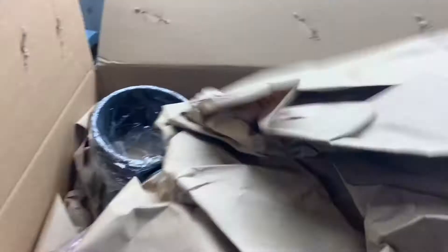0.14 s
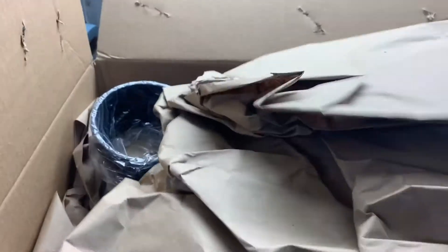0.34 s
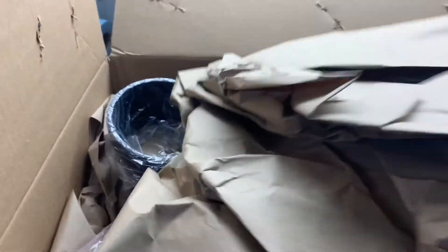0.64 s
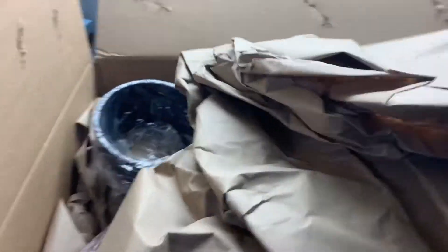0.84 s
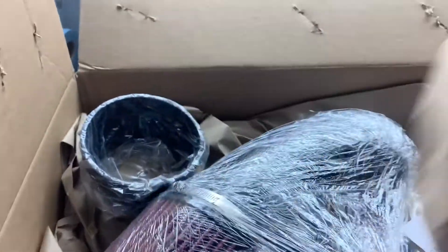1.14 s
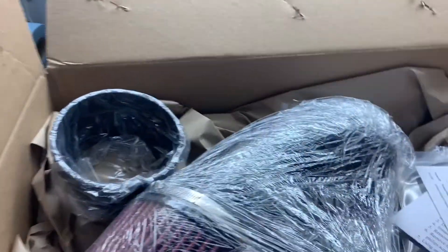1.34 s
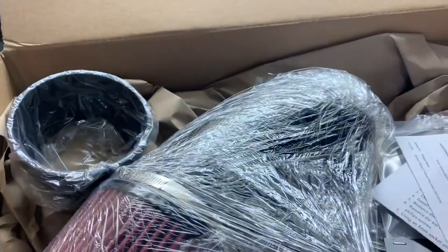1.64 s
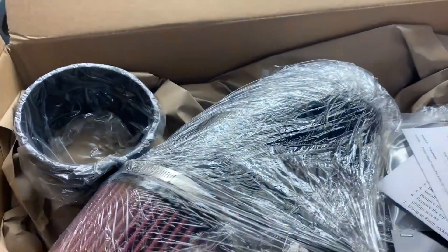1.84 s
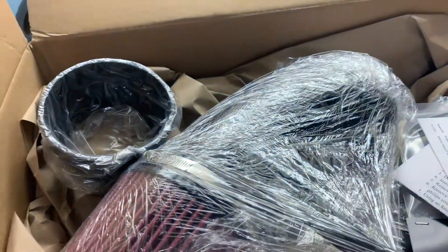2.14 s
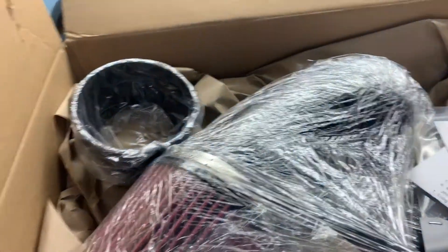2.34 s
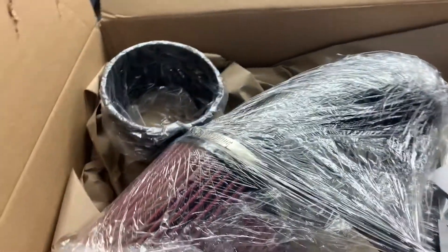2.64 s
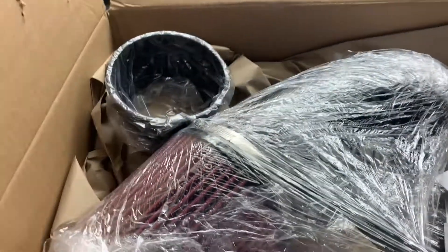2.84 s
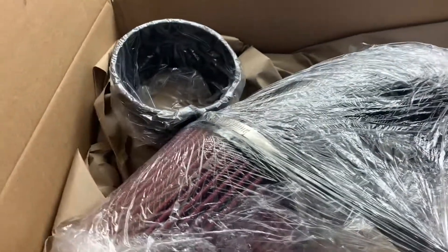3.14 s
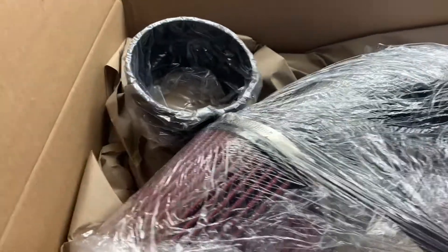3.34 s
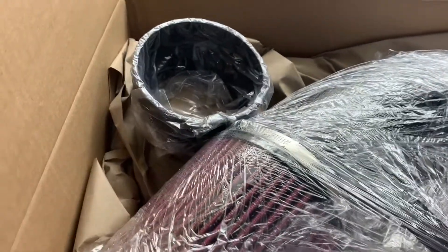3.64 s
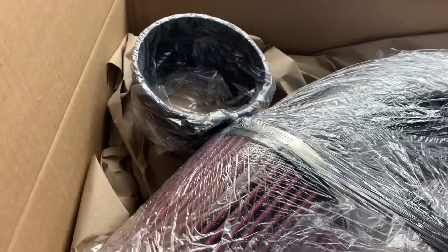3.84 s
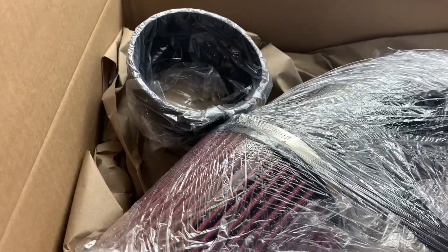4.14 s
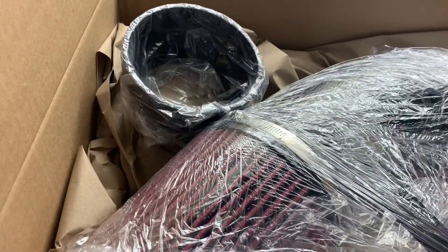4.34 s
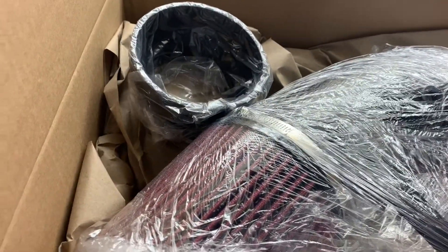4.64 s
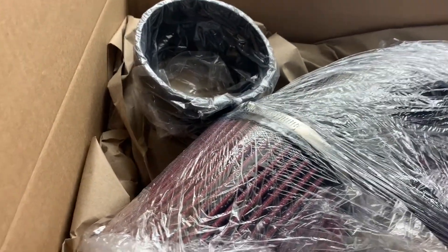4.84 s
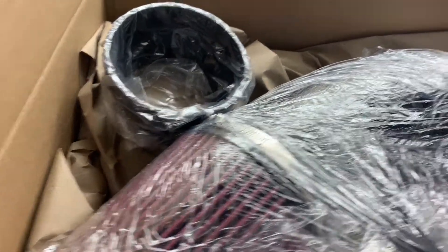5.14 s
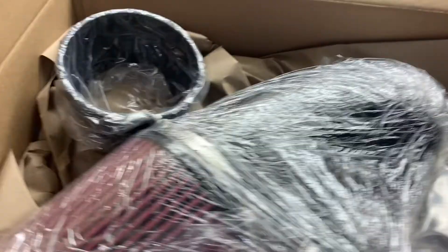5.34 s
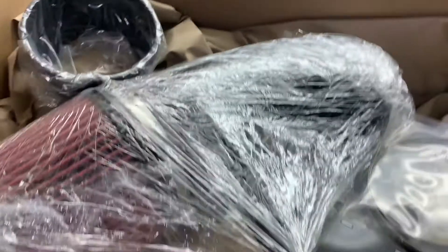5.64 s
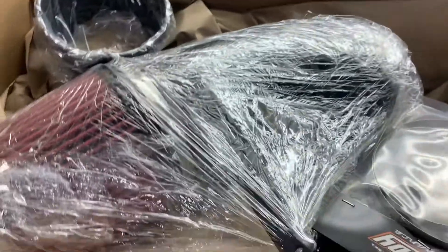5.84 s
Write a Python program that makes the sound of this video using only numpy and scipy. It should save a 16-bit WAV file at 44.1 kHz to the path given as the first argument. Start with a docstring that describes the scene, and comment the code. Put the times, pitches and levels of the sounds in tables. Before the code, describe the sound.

Close up, stiff paper is pulled aside in a thumping cardboard box, followed by faint swishes and cracks of plastic wrap.

```python
"""In a small room, close to the microphone, brown packing paper is pulled aside in a cardboard box.
The sheet rustles as it slides and buckles in many tiny spots, its creases snap, and the box rumbles
and rings with dull knocks. Then the stretch film around the parts inside is brushed and wiped
lightly and gives some last cracks, and something slides softly along the wall of the box."""
import sys
import numpy as np
from scipy import signal
from scipy.fft import rfft, irfft
from scipy.io import wavfile

SR = 44100
rng = np.random.default_rng(int(sys.argv[2]) if len(sys.argv) > 2 else 0)


def to_wav(sig):
    """Store sig (one row per channel, or 1-D mono) as 16-bit WAV at the path in sys.argv[1].

    Samples outside -1..1 are clipped; the rate is SR.
    """
    pcm = np.clip(np.atleast_2d(sig), -1, 1) * 32767
    pcm = np.round(pcm).astype(np.int16)
    wavfile.write(sys.argv[1], SR, pcm.T)  # frames by channels


N = 264335

# the notes at which the box and the air in it ring: (pitch [Hz], level [dB], time to fade by 60 dB [s])
BOX_NOTES = [(56, -34, 0.17), (71.3, -5.5, 0.3), (87.9, -5.5, 0.43), (122.4, -10, 0.34), (156, -31, 0.1),
             (208.7, -13.5, 0.12), (253.4, -13.5, 0.073), (277.6, -10.5, 0.11), (320, -10.5, 0.1),
             (380, -6.5, 0.078), (427, -3.5, 0.038), (483, -25, 0.056), (555, -13, 0.04), (700, -4, 0.068)]


def from_db(db):
    """Turn decibels into a factor to multiply a sound by."""
    return 10 ** (np.asarray(db) / 20)


def rms_one(x):
    """Scale a sound so that its average strength (rms) is 1."""
    return x / np.sqrt(np.mean(x ** 2) + 1e-20)


def band(x, edges_hz, order=2):
    """Keep the part of a sound between a low and a high frequency."""
    return signal.sosfilt(signal.butter(order, edges_hz, "band", fs=SR, output="sos"), x + 1e-18)


def coloured(x, colour, size=2048):
    """Make some frequencies louder and others softer, following rows of (frequency [Hz], level [dB])."""
    hz, db = np.transpose(colour)
    grid = np.maximum(np.fft.rfftfreq(size, 1 / SR), 1)
    gains = from_db(np.interp(np.log(grid), np.log(hz), db))
    # build the filter so that nothing sounds before its cause (minimum phase)
    cepstrum = irfft(np.log(gains))
    cepstrum[1:size // 2] *= 2
    cepstrum[size // 2 + 1:] = 0
    response = irfft(np.exp(rfft(cepstrum)))
    return signal.oaconvolve(np.atleast_2d(x), response[None], axes=1)[:, :x.shape[-1]]


def drift(turns_per_s):
    """A random curve that wanders around zero, typically by about 1."""
    points = rng.standard_normal(4000)
    return rms_one(np.interp(np.arange(N) / SR * turns_per_s, np.arange(len(points)), points))


def stereo_noise(apart_db):
    """Noise that both sides share, plus a little that each has alone."""
    return rng.standard_normal(N) + from_db(apart_db) * rng.standard_normal((2, N))


def from_right(x, lag_samples=13):
    """The box is on the right, so its sound reaches the left side a little later."""
    return np.array([np.pad(x, (lag_samples, 0))[:len(x)], x])


def echoes(x, fade_s, band_hz, delay_s, size):
    """A dense cloud of echoes, different on each side, that fades by 60 dB in fade_s."""
    t = np.arange(size) / SR
    pattern = rng.standard_normal((2, size)) * from_db(-60 * t / fade_s) * (t > delay_s)
    pattern /= np.sqrt(np.sum(pattern ** 2, axis=1, keepdims=True))
    return signal.oaconvolve(x[None], band(pattern, band_hz), axes=1)[:, :len(x)]


def in_box(x, echo_db, fade_s):
    """A sound arrives directly and also bounces off the folds and the cardboard walls."""
    bounces = echoes(x, fade_s, band_hz=[600, 7440], delay_s=0.00072, size=2048)
    return from_right(x) + from_db(echo_db) * bounces


def ring(clicks, hz, fade_s):
    """Each click starts a pure tone that fades by 60 dB in fade_s."""
    decay, turn = from_db(-60 / (fade_s * SR)), 2 * np.pi * hz / SR
    return signal.lfilter([0, np.sin(turn)], [1, -2 * decay * np.cos(turn), decay ** 2], clicks + 1e-18)


def patch_ring(x, hz, q, lift):
    """A flat patch between creases boosts the sound near its own pitch; a higher q rings longer."""
    return x + lift * signal.lfilter(*signal.iirpeak(hz, q, fs=SR), x + 1e-18)


def room_noise(level_db=-59):
    """The steady, dull background of the room."""
    # tone of the background: (frequency [Hz], relative level [dB])
    room_colour = [(25, 3.5), (60, 9), (180, -0.5), (400, -5), (1000, -19.5), (3000, -21), (10000, -24.5),
                   (15500, -56)]
    return from_db(level_db) * rms_one(coloured(stereo_noise(apart_db=-10), room_colour))


def box_rumble(pull_db, level_db=-46.5, usual_pull_db=-40, follows=0.69, lag_s=0.14):
    """The walls of the box rumble softly, following the pull of the hand with a short lag."""
    push = from_db(level_db + follows * (pull_db - usual_pull_db))
    memory = np.exp(-1 / (lag_s * SR))
    lagging_push = signal.lfilter([1 - memory], [1, -memory], push)
    return lagging_push * rms_one(band(stereo_noise(apart_db=-19), [45, 135]))


def wall_slide(friction, start_s=5.08, end_s=5.5, swell_s=0.027, fade_s=0.071, level_db=-49):
    """Something slides along the cardboard with a soft, dull rub that fades in and out."""
    # tone of rubbed cardboard: (frequency [Hz], relative level [dB])
    wall_colour = [(90, -9), (170, -17), (280, 3), (340, -20), (420, -3), (620, -16.5), (930, -13),
                   (1200, -26), (1500, -19.5), (2000, -35.5), (5000, -37), (11000, -44)]
    t = np.arange(N) / SR
    loudness = np.clip(np.minimum((t - start_s) / swell_s, (end_s - t) / fade_s), 0, 1)
    return loudness * from_db(level_db) * rms_one(coloured(friction, wall_colour))


def box_knocks(falloff_db=11, steepening_db=5, build_up_s=0.0098):
    """A knock rings the notes of the box, more weakly the further they are from the spot's own pitch."""
    # knocks on the box: (time [s], strength [dB], pitch that the spot favours [Hz])
    knocks = [(0.003, -5, 237), (0.029, -19, 91.5), (0.052, -16, 240), (0.69, -14, 260), (0.738, -19, 420),
              (0.813, -13, 230), (0.885, -21, 260), (0.962, -13, 280), (0.976, -4.5, 290), (0.99, -16, 360),
              (1.38, -22, 251), (1.491, -16, 165), (1.513, -16, 199), (1.547, -30, 66), (1.873, -21, 70.5),
              (1.893, -15.5, 80), (1.927, -10, 123), (1.953, -13.5, 116), (1.985, -16, 94),
              (1.996, -9.5, 446), (2.008, -16.5, 106), (2.985, -20, 270), (3.015, -12, 219),
              (3.047, -16, 380), (3.135, -23.5, 250), (3.141, -15, 350), (3.193, -16.5, 243),
              (3.234, -27, 282), (3.255, -24, 375), (3.359, -33, 373), (3.532, -22.5, 523),
              (3.7227, -21.5, 353), (4.17, -33, 72), (4.33, -35.5, 89.9), (4.574, -27.5, 380),
              (4.6478, -13.5, 350), (5.676, -32, 174)]
    times, db, favoured_hz = np.transpose(knocks)
    at = np.round(times * SR).astype(int)
    out = np.zeros(N)
    for hz, note_db, fade_s in BOX_NOTES:
        octaves = np.abs(np.log2(hz / favoured_hz))
        pushes = np.zeros(N)
        pushes[at] = from_db(db + note_db - falloff_db * octaves - steepening_db * octaves ** 2)
        # taking away a shorter ring softens the start: cardboard needs a moment to swing
        out += ring(pushes, hz, fade_s) - ring(pushes, hz, build_up_s)
    return from_right(band(out, [48, 650]))   # an open box gives off little below its lowest note


def rubbing(buckles_per_s, spread_db, friction_db, clump_db=1.69, wander_db=5, patches=10):
    """A rubbed sheet clicks with clumps of tiny buckles over a hiss; the strain moves between patches."""
    clumps = from_db(clump_db * drift(110))
    happens = rng.random(N) < buckles_per_s * clumps / SR
    sizes = from_db(spread_db * np.minimum(rng.exponential(1, N), 3))
    buckles = happens * sizes * rng.choice([-1, 1], N)
    which_patch = rng.integers(0, patches, N)
    strain = np.array([from_db(wander_db * drift(22)) for _ in range(patches)])
    strain /= np.sqrt(np.sum(strain ** 2, axis=0))
    out = 0
    for k, hz in enumerate(np.geomspace(350, 11000, patches)):
        hiss = from_db(friction_db) * clumps * rng.standard_normal(N)
        drive = (buckles * (which_patch == k) + hiss) * strain[k]
        out = out + in_box(patch_ring(drive, hz, q=1.43, lift=0.46), echo_db=2.5, fade_s=0.053)
    return out


def scrape(x, lift, wander_db=3, low_hz=650, high_hz=5200, panels=5, size=3072):
    """As the sheet drags, a few panels at a time catch and ring for a moment, each at a new pitch."""
    hop = size // 3
    out, padded = np.zeros((2, N + size)), np.pad(x, ((0, 0), (0, size)))
    catch = np.pad(signal.windows.hann(2 * hop, sym=False), (0, hop))
    for at in range(0, N, hop):
        caught = padded[:, at:at + size] * catch + 1e-18
        for place, chance in rng.random((panels, 2)):
            panel = signal.iirpeak(low_hz * (high_hz / low_hz) ** place, Q=14, fs=SR)
            gain = from_db(wander_db * (2 * chance - 1))
            out[:, at:at + size] += gain * signal.lfilter(*panel, caught)
    return x + lift * out[:, :N]


def shake_walls(x, lift, lowest_hz=150):
    """Rubbing on the cardboard rings the higher notes of the box, which makes the rustle hollow."""
    out = x
    for hz, _, fade_s in BOX_NOTES:
        if hz > lowest_hz:
            q = np.pi * hz * fade_s / np.log(1000)
            out = out + lift * signal.lfilter(*signal.iirpeak(hz, q, fs=SR), x)
    return out


def stroke_shape(t, start, length, swell):
    """One stroke of the hand builds up, keeps growing slightly and stops; the sheet then settles."""
    growth_db_per_s, release_db_per_s = 5.5, 300
    settle_db, settle_db_per_s = -7, 139
    age, since_end = np.maximum(t - start, 0), np.maximum(t - start - length, 0)
    rising = np.sin(np.pi / 2 * np.minimum(age / swell, 1)) ** 2
    dying_db = np.maximum(-release_db_per_s * since_end, settle_db - settle_db_per_s * since_end)
    return rising * from_db(dying_db + growth_db_per_s * age)


def stroke_levels(strokes, steps=6000):
    """Add up strokes into four level curves in dB: flutter, body, rustle and hiss."""
    t = np.linspace(0, N / SR, steps)
    powers = 1e-12
    for start, length, db, flutter_db, body_db, hiss_db, swell in strokes:
        gains = from_db(db + np.array([flutter_db, body_db, 0, hiss_db]))
        powers = powers + np.outer(gains, stroke_shape(t, start, length, swell)) ** 2
    return [np.interp(np.arange(N) / SR, t, 10 * np.log10(power)) for power in powers]


def crumple(friction, levels_db, colour, trims_db):
    """In a rubbed sheet, broad panels flutter, smaller ones give body, creases rustle, the face hisses."""
    # ranges of flutter, body, rustle and hiss: (low edge [Hz], high edge [Hz])
    ranges = [(110, 600), (600, 1400), (1400, 3300), (3300, 17000)]
    sheet = coloured(friction, colour)
    return sum(from_db(db + trim_db) * rms_one(band(sheet, edges, order=3))
               for db, trim_db, edges in zip(levels_db, trims_db, ranges))


def film_swish(friction, swell_s=0.018):
    """Tight film gives a thin, high swish as it is wiped."""
    # wipes along the film: (start [s], length [s], level [dB])
    wipes = [(1.448, 0.057, -43), (3.355, 0.02, -51), (4.768, 0.13, -48.5)]
    # tone of a wipe: (frequency [Hz], relative level [dB])
    swish_colour = [(900, -35), (3000, -37), (4200, -5), (5600, -4), (7000, -10), (8400, 3), (10500, -8),
                    (13500, 1), (15700, -13)]
    t = np.arange(N) / SR
    loudness = sum(from_db(db) * stroke_shape(t, start, length, swell_s) for start, length, db in wipes)
    return loudness * rms_one(coloured(friction, swish_colour))


def film_rustle(friction):
    """Stretch film rustles as it is brushed; gives the sound and its flutter curve in dB."""
    # light strokes over the film: (start [s], length [s], rustle level [dB],
    # flutter [dB above rustle], body [dB above rustle], hiss [dB above rustle], swell time [s])
    strokes = [(1.45, 0.036, -43.5, 2, -4, -5.5, 0.0069), (3.27, 0.081, -57, 6.5, 1.5, 6, 0.033),
               (3.362, 0.014, -50, 4, -3, 13, 0.013), (3.39, 0.098, -61, 2, 0, -3, 0.016),
               (3.472, 0.19, -49, 5, 1.5, 6.5, 0.014), (3.71, 0.21, -53.5, 2.5, -2, 4.5, 0.011),
               (3.915, 0.055, -60.5, 8, 7.5, 7, 0.013), (4.06, 0.2, -57.5, 5, 0.5, 6, 0.044),
               (4.23, 0.16, -57, 2, -0.5, 8.5, 0.021), (4.28, 0.033, -50, 7, 5, 6, 0.041),
               (4.4, 0.089, -49, 3, -7, 8, 0.029), (4.52, 0.16, -55.5, 6, 3, 4.5, 0.017),
               (4.68, 0.084, -59.5, 9, -5, 8.5, .02), (4.76, 0.15, -60.5, 3, -8, 3, 0.034),
               (4.92, 0.025, -51.5, 3, -12, -14, 0.015), (4.97, 0.1, -63.5, -1, -2, 2.5, 0.03),
               (5.085, 0.12, -58, 10, -7, 4, 0.04), (5.47, 0.15, -66.5, 7.5, -2, 5.5, 0.012),
               (5.6, 0.023, -58.5, 11, -2, 2, 0.037), (5.65, 0.31, -59.5, 2.5, -3.5, -0.5, 0.018),
               (5.765, 0.051, -51, 1, -17, -6, 0.013), (5.82, 0.066, -54.5, -7, -3, 0, 0.038),
               (5.89, 0.11, -68, -3, 2, -4, .02)]
    # tone of the film: (frequency [Hz], relative level [dB])
    film_colour = [(90, -53), (200, 18.5), (380, 10.5), (600, -4.5), (1100, -6.5), (1750, -6), (2600, -6),
                   (3900, -3), (5000, -2.5), (7000, -4), (9000, -4), (13000, 0.5), (15700, -10)]
    levels_db = stroke_levels(strokes)
    hollow = shake_walls(scrape(friction, lift=1.3), lift=0.48)
    return crumple(hollow, levels_db, film_colour, trims_db=[-5.0, -2.0, -1.5, 0.5]), levels_db[0]


def paper_rustle(friction):
    """Paper rustles as it is dragged over cardboard; gives the sound and its flutter curve in dB."""
    # pulls on the paper: (start [s], length [s], rustle level [dB],
    # flutter [dB above rustle], body [dB above rustle], hiss [dB above rustle], swell time [s])
    pulls = [(0.0, 0.035, -25, 1, 0.5, -1, 0.0022), (0.045, 0.095, -39, 5, 2.5, 2.5, .012),
             (0.17, 0.12, -39, 5, 0, -1.5, 0.033), (0.315, 0.22, -41, 4, 0, 3.5, 0.006),
             (0.575, 0.12, -33.5, 2.5, -1.5, -1.5, 0.013), (0.63, 0.28, -33, 4.5, 1.5, -0.5, 0.073),
             (0.925, 0.066, -30.5, 7, 1.5, 0.5, 0.051), (1.0, 0.055, -33.5, 5, -1, 2.5, 0.0081),
             (1.06, 0.094, -43, 6, 5, 0, 0.019), (1.13, 0.2, -43, -0.5, -4, 1.5, 0.023),
             (1.47, 0.042, -39, 10.5, 3.5, -5, 0.057), (1.6, 0.11, -48, 2, 0, -11, .03),
             (1.67, 0.035, -48, 11, 4, -3, 0.024), (1.712, 0.036, -44, 4.5, -3, -2.5, 0.015),
             (1.75, 0.06, -50.5, 3, 4, -6, 0.019), (1.818, 0.21, -40, 5, -0.5, -1.5, 0.027),
             (2.04, 0.336, -45, -1.5, -1.5, -5, 0.0078), (2.29, 0.16, -42.5, -3, -2, -4, 0.014),
             (2.44, 0.22, -38.5, 1.5, 1, -0.9, 0.026), (2.67, 0.21, -41, 3.5, -1, -3.5, 0.015),
             (2.895, 0.067, -37, 3, 0.5, 0, 0.022), (2.945, 0.081, -35.5, 4, 2, -5, 0.053),
             (3.03, 0.11, -41.5, 3, 1, -3, 0.026), (3.15, 0.095, -47.5, -2, -0.5, -0.5, 0.015)]
    # tone of the paper: (frequency [Hz], relative level [dB])
    paper_colour = [(90, -7), (170, 4), (280, 4.5), (400, 0), (600, -5), (950, -3.5), (1550, -7.5),
                    (2050, -9), (2500, -7.5), (3000, -9), (4200, -3), (6500, -6), (9500, -9), (13000, -5),
                    (15700, -22)]
    levels_db = stroke_levels(pulls)
    hollow = shake_walls(scrape(friction, lift=0.93), lift=0.6)
    return crumple(hollow, levels_db, paper_colour, trims_db=[-3.3, 0.5, 0.5, 2.1]), levels_db[0]


def set_band_levels(burst, hz, db):
    """Filter a burst so that the band around each frequency has the given level."""
    power = np.mean(np.abs(rfft(burst)) ** 2, axis=0)
    grid, step = np.fft.rfftfreq(burst.shape[1], 1 / SR), np.sqrt(hz[1] / hz[0])
    own_power = [power[(grid > f / step - 50) & (grid < f * step + 50)].mean() for f in hz]
    return coloured(burst, np.column_stack([hz, db - 10 * np.log10(own_power)]))


def crease_snaps(size=6144):
    """A crease creaks, lets go with a crack that rings the patch beside it, and leaves a dying shiver."""
    # creases giving way: (time [s], strength [dB], brightness [dB per octave],
    # pitch of the patch [Hz], time for the shiver to fade by 60 dB [s])
    snaps = [(0.0268, 12, -0.5, 1280, 0.04), (0.028, 6, -1.5, 2480, 0.057),
             (0.0337, -4.5, -6.5, 2620, 0.029), (0.0758, 3, 0.2, 7500, 0.053),
             (0.1215, -2, -1.5, 6900, 0.027), (0.194, -2, -0.2, 1420, 0.031),
             (0.2038, 4.5, -0.5, 13000, 0.019), (0.2295, 0, 1, 3940, 0.013), (0.2332, 1, -3, 4000, 0.021),
             (0.2727, 2, 2, 4000, 0.05), (0.3343, 4.5, -0.5, 4150, 0.056), (0.359, 2, -1, 5600, 0.046),
             (0.393, -6, 0.5, 10500, 0.012), (0.4065, -6.5, 7.5, 8160, 0.015),
             (0.4142, 10, 1.7, 2170, 0.027), (0.429, 0, 1.5, 2250, 0.023), (0.4361, -11, 3.5, 10000, 0.014),
             (0.4862, 2.5, 0.5, 8700, 0.018), (0.4908, 1.5, 1.5, 3980, 0.025),
             (0.5037, 3.5, -0.5, 2220, 0.018), (0.5542, 11, -0.2, 10700, 0.078),
             (0.5638, 4, -2, 3920, 0.08), (0.605, -5, -1.5, 2000, 0.025), (0.6195, -2, 0, 5330, 0.02),
             (0.658, 1, -3.5, 1300, 0.019), (0.68, 1.5, 1.5, 4160, 0.034), (0.75, 2.5, -1, 1550, 0.039),
             (0.8072, 7.5, 1, 925, 0.052), (0.834, 7.5, -3, 5930, 0.058), (0.8721, 6.5, -0.5, 10500, 0.016),
             (0.9077, 1, -3.5, 3800, 0.007), (1.116, -13.5, 5, 2260, 0.045),
             (1.198, -13, 2.5, 10000, 0.066), (1.325, -10.5, -3.5, 3500, 0.039),
             (1.366, -6, -4.5, 5040, 0.12), (1.6376, -15.5, -2.5, 2680, 0.028),
             (1.7222, -2.5, -3.5, 920, 0.12), (1.8249, -10.5, -2, 2600, 0.084),
             (1.925, -0.5, -2.5, 1510, 0.067), (2.028, -8, 2, 9800, 0.012), (2.0715, -16, -7, 2200, 0.03),
             (2.0945, -28, 2.5, 10000, 0.026), (2.127, -16.5, -6.5, 3900, 0.014),
             (2.1902, -10.5, -3.5, 3660, 0.05), (2.233, -6.5, 0, 3350, 0.026),
             (2.297, -10, -1, 7000, 0.022), (2.326, -2.5, -1, 8900, 0.011), (2.3318, 2.5, -2, 1010, 0.087),
             (2.397, -9, -6, 950, 0.091), (2.563, -3.5, -1.5, 925, 0.04), (2.752, -3, -1.5, 930, 0.065),
             (2.988, -5, -1, 1440, 0.079), (3.1373, -2, -3.5, 740, 0.059), (3.19, -10, -3, 13000, 0.04),
             (3.2387, -2.5, -1, 725, 0.013), (3.317, -15.5, -2, 740, 0.022),
             (3.4888, -5.5, 0.5, 5100, 0.068), (3.5503, -9.5, -1, 3550, 0.02),
             (3.5855, 2, -1.5, 1750, 0.026), (3.596, -11, -1, 12860, 0.021), (3.654, -18, 5, 4410, 0.012),
             (3.661, 0, 2.5, 1120, 0.031), (3.722, -11, 0.5, 12380, 0.07),
             (3.8955, -13.5, 3.5, 1690, 0.038), (3.9297, -21, -5, 4230, 0.02),
             (4.116, -21, 2.5, 1830, 0.028), (4.303, -14.5, -3.5, 1180, 0.05),
             (4.4432, -5, -0.5, 2270, 0.05), (4.46, -12, -4, 920, 0.024), (4.4945, -7.5, -4, 8770, 0.098),
             (4.5395, -12.5, -4.5, 3800, 0.015), (4.5718, -12, -4.4, 3730, 0.015),
             (4.5754, -21.5, -7, 2010, 0.018), (4.6469, 7.5, -0.2, 6500, 0.0095),
             (4.6531, 2, -1, 3580, 0.02), (4.6584, -11, 5, 2120, 0.057), (4.944, -22, -1.5, 2500, 0.06),
             (4.96, -15.5, 0.5, 4300, 0.033), (5.4855, -19, 1.5, 3370, 0.06),
             (5.628, -21, -0.2, 6170, 0.055), (5.796, -16, -3.5, 2580, 0.096),
             (5.809, -22.5, -0.5, 2100, 0.084)]
    # tone that all snaps share: (frequency [Hz], relative level [dB])
    snap_colour = [(110, -16), (300, -2.5), (600, 1), (1200, 2.5), (1750, 0), (2450, -3.6), (3500, 0.5),
                   (4900, 5.5), (7000, -4), (9900, -3.5), (14000, -6.5)]
    creak_db, creak_s, crack_s, crunch_s = -25, 0.0052, 0.0005, 0.11
    shiver_db, grain_db, usual_shiver_s = -15, 5, 0.04
    patch_db, patch_octaves, tilt_centre_hz = 1.5, 0.82, 3000
    lead = size // 16   # samples of creak before the crack
    t = (np.arange(size) - lead) / SR
    age = np.abs(t)
    hz = np.geomspace(110, 15000, 22)
    colour_hz, colour_db = np.transpose(snap_colour)
    shared_db = np.interp(np.log(hz), np.log(colour_hz), colour_db)
    out = np.zeros((2, N + size))
    for time, db, tilt, patch_hz, fade_s in snaps:
        grains = np.clip(rng.standard_normal(size // 32), -2, 2)
        uneven = from_db(grain_db * np.repeat(grains, 32))
        creak = from_db(creak_db) * np.exp(-age / creak_s) * uneven
        shiver = from_db(shiver_db - 60 * age / fade_s) * uneven
        # creases deeper in the pile shiver longer, crack less and echo more; the deepest only crunch
        crack = np.exp(-age / crack_s) / (1 + (fade_s / crunch_s) ** 2)
        echo_db = -1 + 2.5 * np.log2(fade_s / usual_shiver_s)
        burst = np.where(t < 0, creak, crack + shiver) * rng.standard_normal(size)
        burst = in_box(burst, echo_db, fade_s=0.048)
        bump_db = patch_db * np.exp(-(np.log2(hz / patch_hz) / patch_octaves) ** 2)
        tilt_db = tilt * np.log2(hz / tilt_centre_hz)
        burst = set_band_levels(burst, hz, db + shared_db + bump_db + tilt_db)
        at = round(time * SR) - lead
        out[:, at:at + size] += patch_ring(burst, patch_hz, q=12, lift=0.99)
    return out[:, :N]


def scene():
    """First the grainy paper, then the smoother film, with the box and a little of the room."""
    grainy = rubbing(buckles_per_s=1500, spread_db=3.0, friction_db=-21)
    smooth = rubbing(buckles_per_s=1800, spread_db=4.0, friction_db=-16.5)
    paper, paper_flutter_db = paper_rustle(grainy)
    film, film_flutter_db = film_rustle(smooth)
    sheets = paper + film + film_swish(smooth) + crease_snaps()
    pull_db = np.maximum(paper_flutter_db, film_flutter_db)   # the broad panels push on the box
    near = sheets + box_knocks() + box_rumble(pull_db) + wall_slide(smooth)
    room = from_db(-16.5) * echoes(near[1], fade_s=0.56, band_hz=[156, 4930], delay_s=0.01, size=16384)
    return near + room + room_noise()


def record(dry):
    """Each side of the microphone has its own tone; the tallest peaks are rounded and the top is cut."""
    # tone of the left and right microphone openings: (frequency [Hz], gain [dB])
    left_colour = [(100, 0.5), (600, 0), (1050, 2), (1550, 3), (1950, 10.5), (2300, 6.5), (3000, -1),
                   (7000, 0), (8400, 4), (10500, 0.5)]
    right_colour = [(100, 0.4), (600, -0.03), (1250, 0.5), (2150, 6.5), (3000, -0.26), (7000, 0.63),
                    (8400, 8), (10500, 1)]
    peak_limit, cutoff_hz = 0.9, 15750
    sides = np.vstack([coloured(dry[0], left_colour), coloured(dry[1], right_colour)])
    rounded = sides / (1 + (sides / peak_limit) ** 4) ** .25
    return signal.sosfilt(signal.ellip(10, .1, 80, cutoff_hz, fs=SR, output="sos"), rounded)


dry = scene()
out = record(dry)
to_wav(out)
```